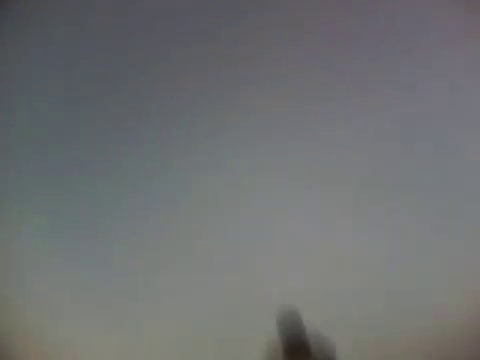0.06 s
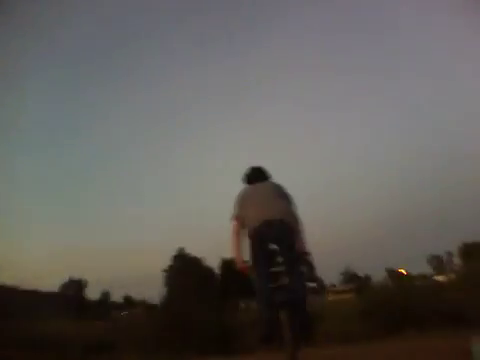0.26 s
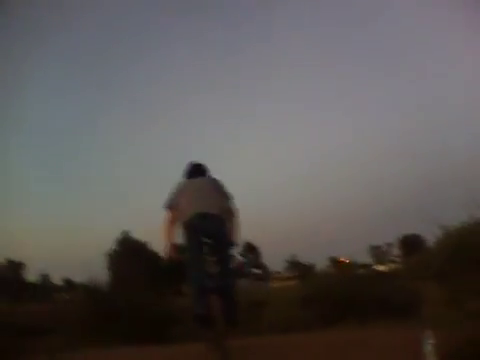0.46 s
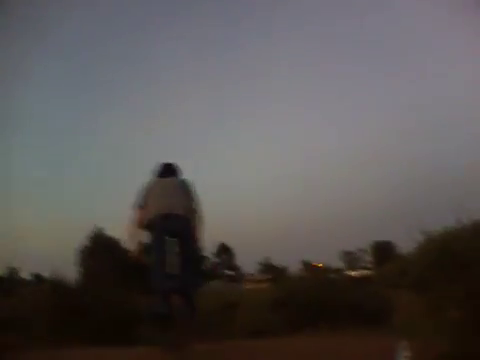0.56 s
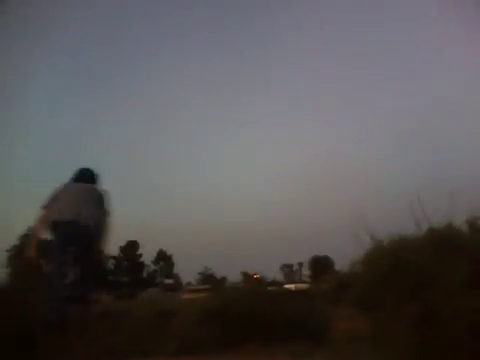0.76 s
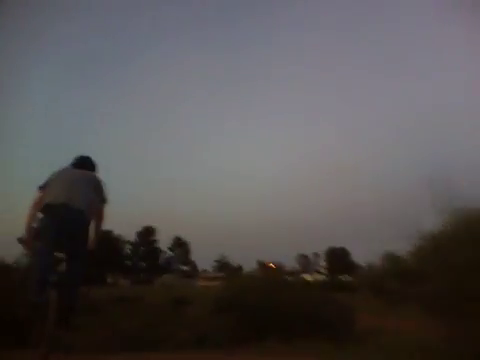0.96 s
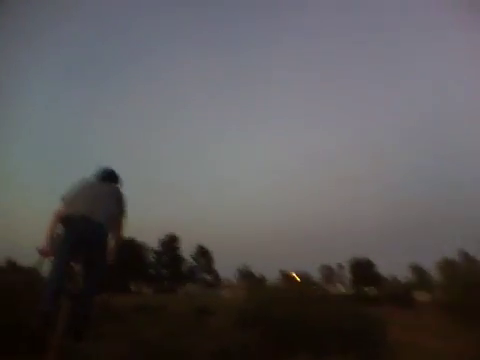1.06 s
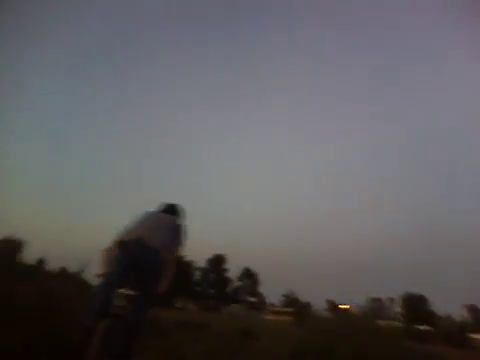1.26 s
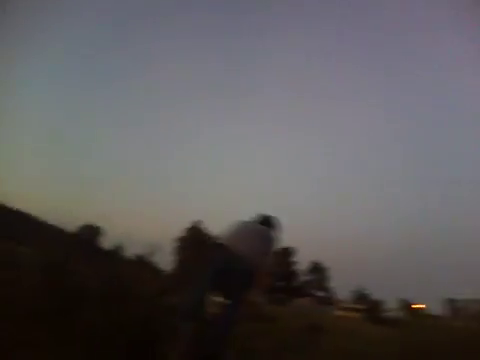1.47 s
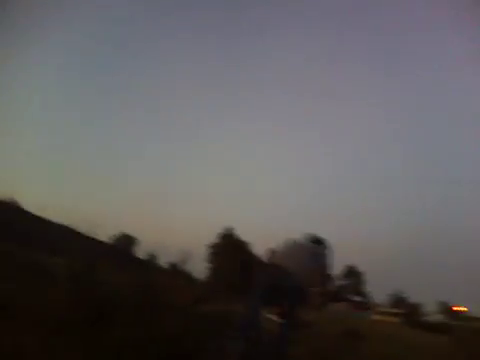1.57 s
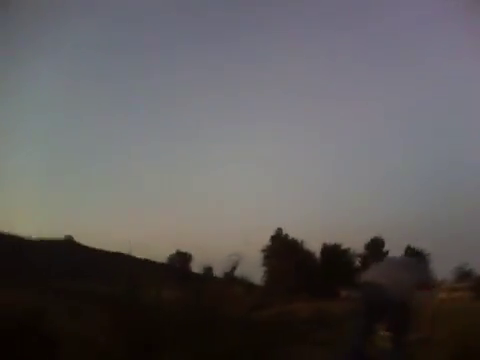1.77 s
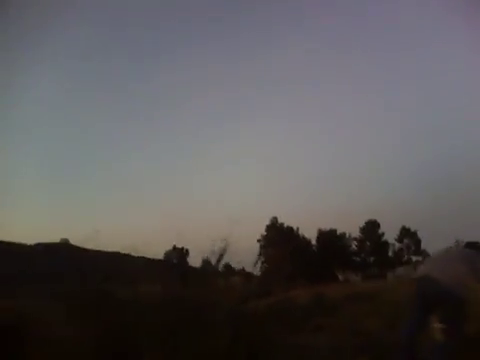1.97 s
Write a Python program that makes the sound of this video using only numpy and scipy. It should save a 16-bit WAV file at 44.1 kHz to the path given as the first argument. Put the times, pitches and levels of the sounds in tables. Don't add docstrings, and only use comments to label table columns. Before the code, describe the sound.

After a brief quiet roll with a faint pebble ping, a bicycle lands in a very loud overloaded crack, then rolls on over rough dirt with metallic rattling and dull housing knocks, close and dry outdoors.

```python
import sys
import numpy as np
from scipy import signal
from scipy.io import wavfile

SR = 44100
rng = np.random.default_rng(int(sys.argv[2]) if len(sys.argv) > 2 else 0)


def boost(x):
    u = np.asarray(x, float) / 20
    return 10 ** u


def output_pcm(signal):
    pcm = np.clip(np.atleast_2d(signal).T, -1, 1) * 32767
    wavfile.write(sys.argv[1], SR, np.round(pcm).astype(np.int16))


N = 88200

BLOW_TIMES = [.2035, .2058, .2129, .2141, .2158, .2214, .2261, .2272, .2402, .2542, .2574, .2735, .2066,
              .2132, .2185, .2218, .2548, .1105, .2045]
# level in dB, pitch in Hz, T60 in seconds.
BLOW_NOTES = [(2, 1460, 0.026), (7, 1005, 0.025), (3.5, 3710, 0.0052), (3, 1730, 0.01), (-2, 2200, 0.016),
              (10.5, 997, 0.0054), (-8.5, 4800, 0.0037), (-14.5, 703, 0.043), (-36, 2800, 0.017),
              (-12, 2170, 0.008), (-23, 3100, 0.012), (-6, 2230, 0.0051), (-14, 2600, 0.039),
              (-2, 6000, 0.0027), (-11, 2240, 0.024), (-11, 1970, 0.012), (-1, 2260, 0.0021),
              (-25, 2090, 0.011), (-7.5, 4520, 0.005)]
# start in seconds, peak level in dB, pitch of the camera's
# nod in Hz.
BUMPS = [(0.027, -29, 628.6), (0.11, -16.5, 579), (0.124, -24.5, 638.8), (0.147, -37, 584),
         (0.246, -18, 570), (0.277, -18, 580.4), (0.316, -21.5, 591.3), (0.346, -23.5, 580.7),
         (0.388, -17.5, 602), (0.423, -20, 579.7), (0.445, -24.5, 586), (0.447, -25, 607),
         (0.526, -21.5, 610.2), (0.548, -31, 575), (0.574, -18, 589.7), (0.601, -23, 578),
         (0.661, -26.5, 592), (0.695, -21.5, 597.2), (0.72, -21, 603.8), (0.743, -21.5, 615.6),
         (0.783, -18.5, 575.5), (0.808, -17, 594), (0.844, -21.5, 596), (0.885, -26, 622),
         (0.914, -20, 556.5), (0.94, -19, 570.8), (0.974, -25, 577.2), (1.028, -17.5, 573),
         (1.059, -15.5, 590.6), (1.085, -30.5, 606.8), (1.143, -23, 576.5), (1.169, -29, 579),
         (1.211, -25.5, 596.7)]
# start in seconds, peak level in dB, pitch of the nod in Hz.
LATER_BUMPS = [(1.294, -23.5, 604.6), (1.319, -22, 589), (1.354, -23.5, 542.2), (1.374, -11, 594.7),
               (1.409, -18.5, 584.5), (1.439, -25.5, 608), (1.471, -20, 614.6), (1.499, -23.5, 574.2),
               (1.539, -26, 617), (1.566, -20, 556), (1.584, -22.5, 591.7), (1.62, -20.5, 597.2),
               (1.657, -23.5, 568), (1.67, -28.5, 590), (1.711, -21.5, 606), (1.748, -21.5, 583.8),
               (1.768, -35, 584), (1.801, -26.5, 605), (1.837, -23.5, 591), (1.859, -25, 559),
               (1.894, -25, 603.7), (1.946, -25.5, 600), (1.978, -20.5, 600)]
# pitch in Hz, level in dB, T60 in seconds.
HOUSING_MODES = [(115, -18.5, 0.03), (228.2, -16.5, 0.088), (538.8, -12, 0.081), (563.4, -16, 0.14),
                 (604, -12, 0.26), (734.6, -27, 0.24), (914.6, -19.5, 0.053), (1034, -17.5, 0.039),
                 (1213, -26.5, 0.056), (1389, -10, 0.025), (1644, -23.5, 0.046)]
# time in seconds, level in dB.
TRACK_ROUGHNESS = [(0, -34.5), (.19, -27), (.26, -20.5), (.45, -33), (.65, -27.5), (.8, -26.5),
                   (1.08, -26.5), (1.24, -34.5), (1.4, -22.5), (1.65, -28), (2, -31.5)]
# start in seconds, peak level in dB, pitch
# of the tube in Hz.
SLAPS = [(0.0914, -31.5, 2400), (0.1096, -43, 2080), (0.1273, -32, 2980), (0.1501, -35, 2420),
         (0.2964, -17.5, 2880), (0.3037, -21, 2570), (0.2552, -22, 4060), (0.275, -28, 2700),
         (0.288, -19, 1420), (0.313, -27.5, 2700), (0.345, -25, 2500), (0.3735, -28, 3100),
         (0.397, -39, 2500), (0.3316, -21.5, 2070), (0.3555, -21.5, 2510), (0.3873, -26.5, 2780),
         (0.4596, -23.5, 2680), (0.4545, -35, 3000), (0.5262, -22, 2960), (0.5295, -22.5, 1340),
         (0.5924, -28, 3100), (0.6608, -26.5, 4680), (0.6942, -26.5, 2420), (0.7598, -15, 2350),
         (0.784, -20.5, 2980), (0.8154, -14.5, 2933), (0.8195, -23.5, 1400), (0.8494, -23, 3392),
         (0.8665, -15, 3710), (0.9153, -15, 4680), (0.9415, -23, 3115), (0.965, -18, 3185),
         (1.0179, -15.5, 3710), (0.988, -23.5, 1690), (1.048, -21.5, 2279), (1.067, -20.5, 2560),
         (1.0964, -36, 3160), (1.1191, -17, 2820), (1.1716, -21.5, 2850),
         (1.133, -24.5, 2707), (1.191, -27.5, 3500), (1.2487, -30, 2351), (1.279, -19, 2887),
               (1.3575, -23, 3307), (1.3805, -30, 2458), (1.4133, -24.5, 3061), (1.4162, -18.5, 2930),
               (1.4579, -29, 2285), (1.465, -19.5, 2410), (1.519, -21, 4664), (1.5362, -29.5, 2543),
               (1.5744, -26, 4680), (1.6019, -25.5, 2660), (1.628, -28, 3132), (1.6412, -35, 3156),
               (1.661, -21.5, 2900), (1.672, -32, 5800), (1.706, -42, 3516), (1.7365, -26, 5800),
               (1.7991, -34, 2491), (1.8407, -35, 2592), (1.858, -25, 4060), (1.869, -27, 2900),
               (1.914, -24, 3120), (1.976, -24, 4680)]
# frequency in Hz, density in dB per Hz.
SLAP_SPECTRUM = [(600, -34.5), (1000, -12.5), (2000, -12), (3000, -8.5), (4500, -12), (6500, -19),
                 (10000, -45), (16000, -62)]
# pitch in Hz, level in dB, T60 in seconds.
TUBE_MODES = [(1285, -5.5, 0.075), (1421, -4.5, 0.023), (1690, -3.5, 0.037), (2350, -10.5, 0.042),
              (2672, -3.5, 0.018), (3120, -8.5, 0.041), (3390, -15.5, 0.036), (3710, -21, 0.11),
              (4060, -28, 0.11), (4680, -8.5, 0.037), (5830, -14.5, 0.035)]
# start in seconds, level in dB.
PEBBLES = [
    (0.0404, -33),
    (0.4825, -33),
]
# pitch in Hz, level in dB, T60 in seconds.
FIRST_SPOKE = [(1530, 1.5, 0.04), (2445, 1.5, 0.32), (3070, 6.5, 0.026), (3727, 2.5, 0.15),
               (4660, 1.5, 0.036), (5790, 2, 0.028), (6680, -9.5, 0.094), (8350, -20, 0.1)]
# pitch in Hz, level in dB, T60 in seconds.
SECOND_SPOKE = [(2868, -4, 0.53), (3370, -7, .08), (3970, -3.5, 0.1), (4880, -10, 0.054), (8650, -19, 0.04)]
# frequency in Hz, density in dB per Hz.
AIR_SPECTRUM = [(60, -34), (110, -8), (240, -14), (370, -14), (900, -48), (2500, -25), (7000, -37.5),
                (16000, -39)]


def ring(clicks, hz, t60):
    r, w = boost(-60 / (t60 * SR)), 2 * np.pi * hz / SR
    return signal.lfilter([0, np.sin(w)], [1, -2 * r * np.cos(w), r * r], clicks + 1e-18)


def fade(clicks, t60):
    return signal.lfilter([1], [1, -boost(-60 / (t60 * SR))], clicks + 1e-18)


def train(s, gains):
    out = np.zeros(N)
    np.add.at(out, np.minimum(np.asarray(s) * SR, N - 1).astype(int), gains)
    return out


def grains(per_s, size_db):
    struck = rng.random(N) < per_s / SR
    size = boost(size_db * np.minimum(rng.exponential(1, N), 4))
    x = struck * size * rng.choice([-1, 1], N)
    return x / x.std()


def drift(rate_hz):
    r = np.exp(-2 * np.pi * rate_hz / SR)
    x = signal.lfilter([1], [1, -2 * r, r * r], rng.standard_normal(N + SR))[SR:]
    return x / x.std()


def bandpass(x, order, low_hz, high_hz):
    return signal.sosfilt(signal.butter(order, [low_hz, high_hz], "band", fs=SR, output="sos"), x)


def coloured(x, spectrum, tilt_db, patchy_db):
    hz, db = np.transpose(spectrum)
    edges = 44 * 2 ** np.arange(0, 8.6, .5)
    out = 0
    for k, (low, high) in enumerate(zip(edges, edges[1:])):
        mid = np.sqrt(low * high)
        if mid > hz[0] * .7:
            level_db = np.interp(np.log(mid), np.log(hz), db)
            level_db = level_db + tilt_db * np.log2(max(mid, 3000) / 3000)
            level_db = level_db + patchy_db * drift(18.5) * min(1, 2500 / mid)
            out = out + boost(level_db) * bandpass(x[k % 2], 2, low, high)
    return out


def slam():
    rise_s, crack_db, crack_t60_s = .0004, -18, 0.0084
    t = np.arange(SR // 8) / SR
    notes = np.zeros(N)
    for s, (level_db, hz, t60) in zip(BLOW_TIMES, BLOW_NOTES):
        envelope = boost(level_db - 60 * t / t60 + 3) * (1 - np.exp(-t / rise_s))
        notes[int(s * SR):][:len(t)] -= envelope * np.sin(2 * np.pi * hz * t)
    db = np.transpose(BLOW_NOTES)[0]
    crack = fade(train(BLOW_TIMES, boost(db + crack_db)), crack_t60_s)
    crack = crack * bandpass(2 * grains(15000, 0.45), 1, 1350, 4700)
    rings = ring(train(BLOW_TIMES[:1], boost(-4.0)), 591.0, 0.11)
    rings = rings + ring(train(BLOW_TIMES[5:6], boost(-31.0)), 921.0, 0.44)
    thud = ring(train(BLOW_TIMES[:6], boost(-13)), 120, 0.025)
    return notes + crack + rings + thud


def sway():
    rise_s, t60_s, glide_s = 0.0022, .1, 0.0056
    s, db, hz = np.transpose([*BUMPS, *LATER_BUMPS])
    rise, glide = np.exp(-1 / (rise_s * SR)), np.exp(-1 / (glide_s * SR))
    size = signal.lfilter([(1 - rise) ** 2], [1, -2 * rise, rise * rise], fade(train(s, boost(db)), t60_s))
    held = hz[np.clip(np.searchsorted(s, np.arange(N) / SR) - 1, 0, None)]
    pitch = hz[0] + signal.lfilter([1 - glide], [1, -glide], held - hz[0])
    return size * np.sin(2 * np.pi * np.cumsum(pitch) / SR)


def housing():
    push_hz, spread_db, tread_db, tread_lump_db = 172, -1.5, -26.5, 5.5
    s, db, _ = np.transpose([*BUMPS, *LATER_BUMPS])
    rough_db = np.interp(np.arange(N) / SR, *np.transpose(TRACK_ROUGHNESS))
    tread = boost(rough_db + tread_db) * grains(430, 1.5)
    spread = rng.standard_normal((len(s), len(HOUSING_MODES)))
    r = np.exp(-2 * np.pi * push_hz / SR)
    out = 0
    for k, (hz, level_db, t60) in enumerate(HOUSING_MODES):
        bumps = train(s, boost(db + spread_db * spread[:, k]))
        bumps = bumps * (abs(hz - 580) > 40)
        push = bumps + tread * boost(tread_lump_db * drift(11.9))
        w = 2 * np.pi * hz / SR
        swell = signal.lfilter([1 - r], [1, -r * np.exp(1j * w)], push).real * 2
        out = out + boost(level_db) * ring(swell, hz, t60)
    return out


def loose_parts():
    start_s, attack_s, hold_s, t60_s = .284, .01, .06, .2
    t = np.arange(N) / SR - start_s
    decay = boost(-60 * np.maximum(t - hold_s, 0) / t60_s)
    settle = boost(-32) * np.clip(t / attack_s, 0, 1) * decay * boost(6.0 * drift(120) - 4)
    jingle = boost(-48.5 + 5.0 * drift(100))
    return settle, jingle


def slap_noise(s, db, tube_hz, links, loose):
    rise_s, t60_s, tail_db, tail_t60_s = 0.00079, 0.02, -8, 0.084
    bounce_s, bounce_loss_db = 0.017, 4.5
    uneven = rng.random((len(s), 4))
    hits = train(s, boost(db))
    for k in range(2):
        bounce_at = s + bounce_s * (k + uneven[:, k]) / 2 + 0.0019
        hits = hits + train(bounce_at, boost(db - bounce_loss_db * (4 + k + uneven[:, k + 2])))
    r = np.exp(-1 / (rise_s * SR))
    body = fade(hits, t60_s) + boost(tail_db) * fade(hits, tail_t60_s)
    snap = boost(-7.5) * fade(hits, 0.0049)
    shake = signal.lfilter([1 - r], [1, -r], body) + 3 * loose + snap
    bright_db = 0.9 * (db + 17) + 3.5 * np.log2(tube_hz / 3000)
    tilt_db = bright_db[np.clip(np.searchsorted(s, np.arange(N) / SR) - 1, 0, None)]
    return boost(3.5) * coloured(links * shake, SLAP_SPECTRUM, tilt_db, patchy_db=-1.5)


def tubes(s, db, tube_hz, links, buzz):
    frame_db, spread_db, strike_db, loss_db_per_octave = -16.5, 3, 13.5, 21.5
    spread = rng.standard_normal((len(s), len(TUBE_MODES)))
    out = 0
    for k, (hz, level_db, t60) in enumerate(TUBE_MODES):
        octaves = np.minimum(abs(np.log2(hz / tube_hz)), .6 if hz > 1500 else 0.31)
        own_db = db + spread_db * spread[:, k] - loss_db_per_octave * octaves
        strike = train(s + 0.000988, boost(own_db + strike_db))
        scrape = fade(train(s, boost(own_db - 4.0)), 0.01)
        scrape = scrape + buzz * boost(3.5 * drift(37.0) - 7.5)
        out = out + boost(frame_db + level_db) * ring(strike + scrape * links[k % 2], hz, t60)
    return out


def rattle():
    s, db, tube_hz = np.transpose(sorted(SLAPS))
    settle, jingle = loose_parts()
    links = np.array([grains(4000, 2.5) for _ in range(2)])
    noise = slap_noise(s, db, tube_hz, links, settle + jingle)
    return noise + tubes(s, db, tube_hz, links, jingle + (1 - .7) * settle)


def pings():
    out = np.zeros(N)
    for (s, db), spoke in zip(PEBBLES, (FIRST_SPOKE, SECOND_SPOKE)):
        for hz, level_db, t60 in spoke:
            out += ring(train([s], boost(db + level_db)), hz, t60)
    return out


def air():
    air_db, gust_db, gust_hz, gust_t60_s = -48.5, -36.5, 345, 0.27
    x = coloured(rng.standard_normal((2, N)), AIR_SPECTRUM, 0, patchy_db=1.0)
    gust = signal.sosfilt(signal.butter(4, gust_hz, fs=SR, output="sos"), rng.standard_normal(N))
    gust_level = boost(gust_db - 60 * np.arange(N) / SR / gust_t60_s)
    return boost(air_db) * x / x.std() + gust_level * gust / gust.std()


def scene():
    return (slam() + sway() + housing() + rattle() + pings() + air())[None]


def band_limit(x):
    return signal.sosfilt(signal.butter(12, 16390, fs=SR, output="sos"), x)


def record(dry):
    heard = signal.sosfilt(signal.butter(2, 80, "high", fs=SR, output="sos"), dry)
    clipped = np.clip(heard, -1, 1)
    return band_limit(clipped)


dry = scene()
out = record(dry)
output_pcm(out)
```